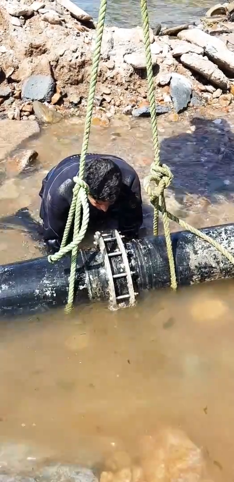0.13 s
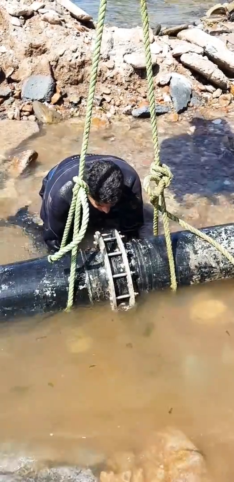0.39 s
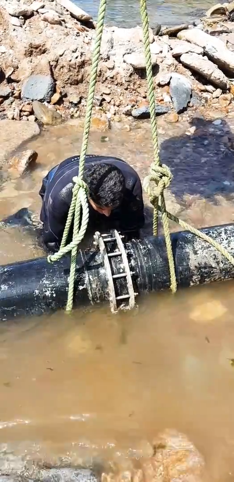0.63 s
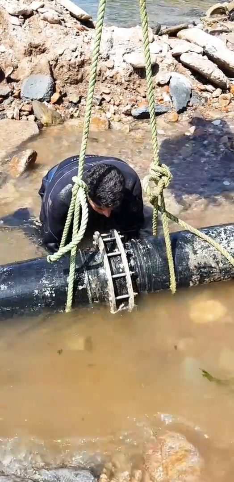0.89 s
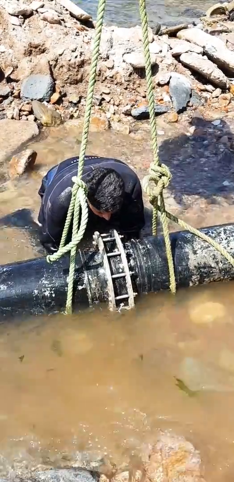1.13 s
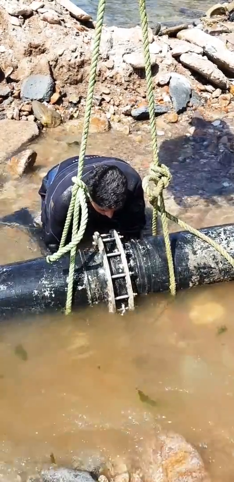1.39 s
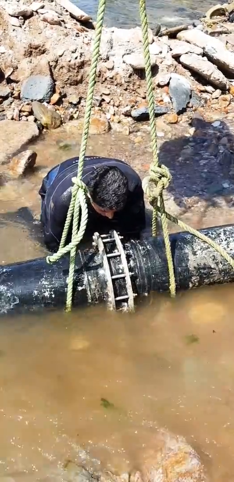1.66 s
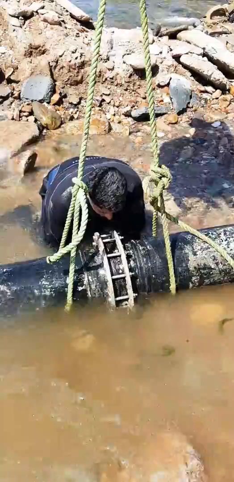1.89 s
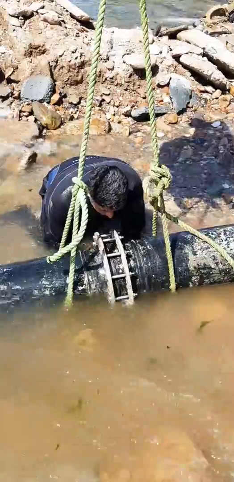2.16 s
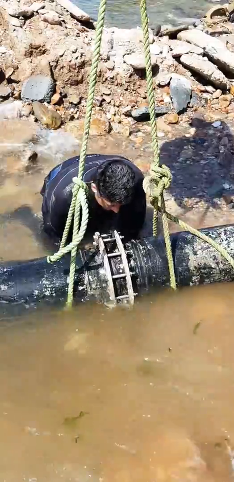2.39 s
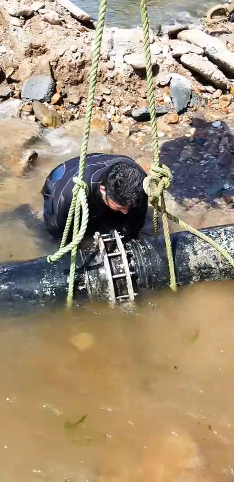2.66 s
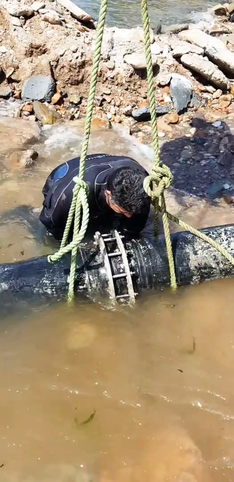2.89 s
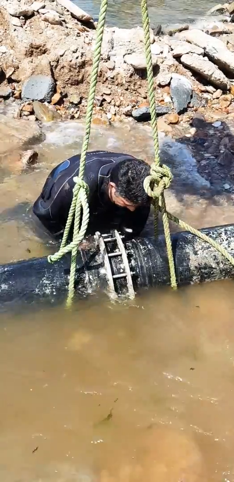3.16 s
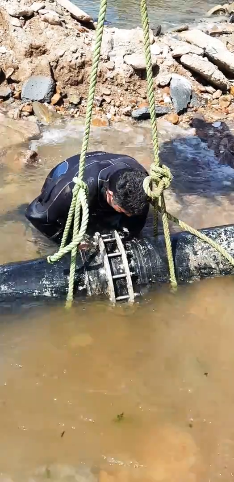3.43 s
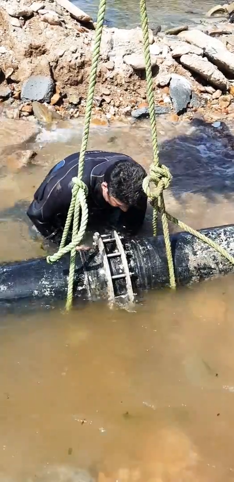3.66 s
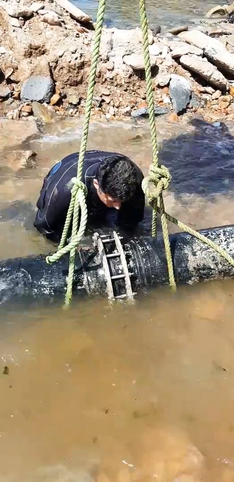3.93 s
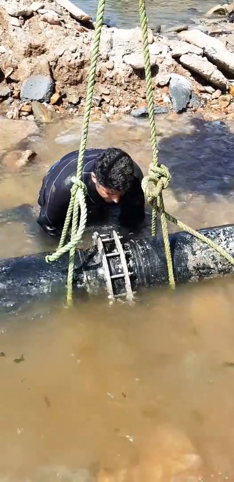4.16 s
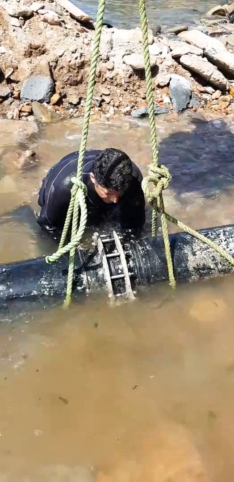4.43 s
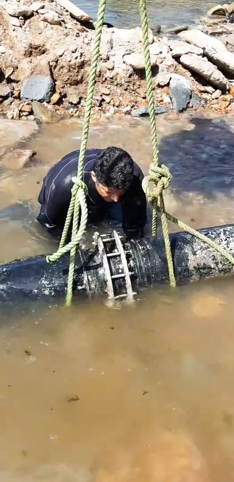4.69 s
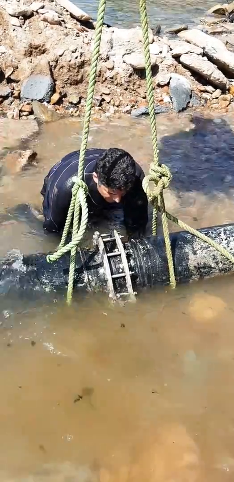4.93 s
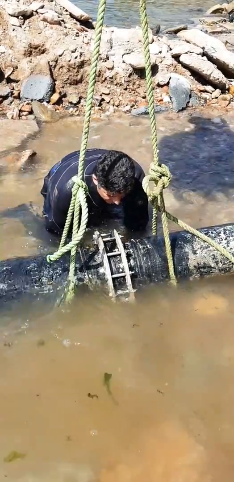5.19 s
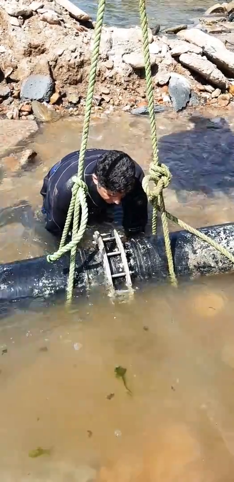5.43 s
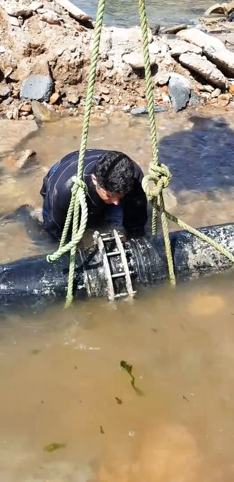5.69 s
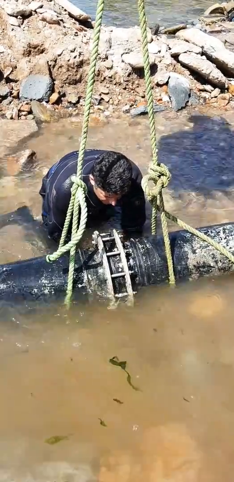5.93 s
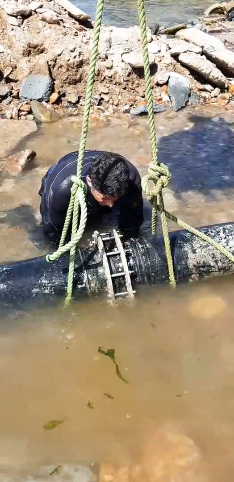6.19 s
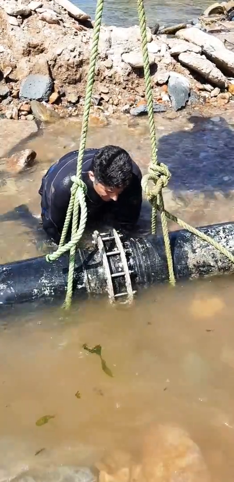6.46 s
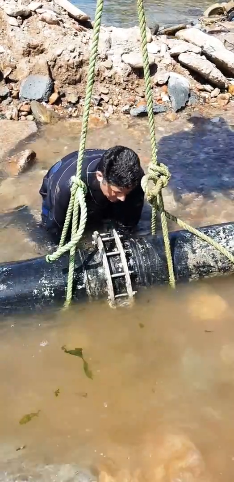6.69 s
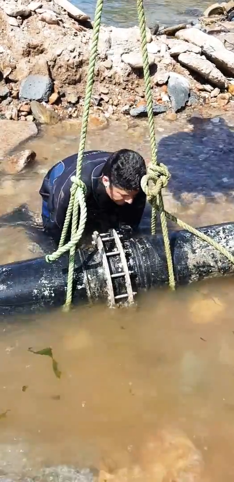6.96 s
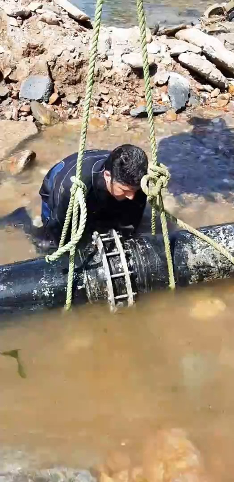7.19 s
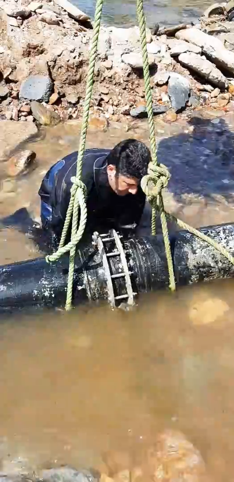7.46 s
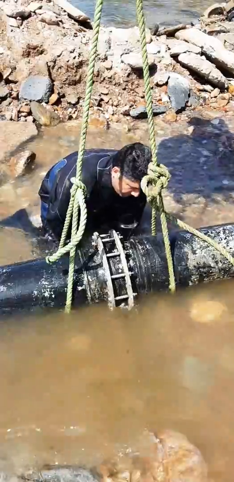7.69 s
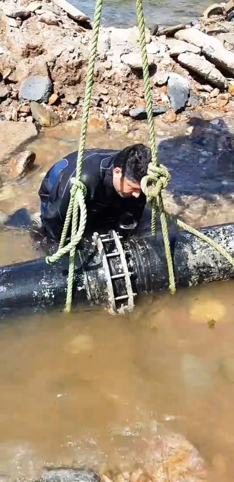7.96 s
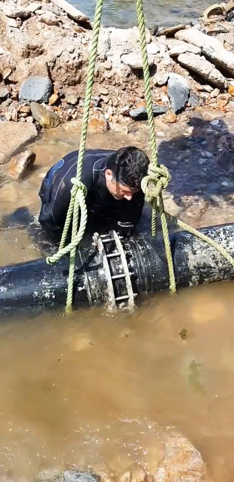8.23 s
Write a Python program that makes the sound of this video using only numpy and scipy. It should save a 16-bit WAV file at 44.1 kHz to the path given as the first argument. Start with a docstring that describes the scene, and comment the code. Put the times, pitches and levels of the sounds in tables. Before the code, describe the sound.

A diesel engine idles throughout, a deep humming drone with fast flutter and faint whine, its speed wavering about once a second and briefly sagging just before four seconds. Shallow water washes over stones in soft swells, with bubbles pattering, sharp tiny pops and a few low gulps. Open air, stereo phone close to the water, engine off to one side.

```python
"""A six-cylinder diesel idles at a rocky shore, its speed hunting a little about once a second.
Each firing rings the exhaust modes; pump and fan tones whine faintly, locked to the crank, over throbbing noise.
Wavelets wash over the stones as swelling noise bands with splashes; bubbles patter, plop and gulp as damped tones.
A phone with two microphone ports hears it in stereo."""
import sys
import numpy as np
from scipy import signal
from scipy.fft import rfft, irfft, next_fast_len
from scipy.io import wavfile
from scipy.ndimage import uniform_filter1d

SR = 44100
rng = np.random.default_rng(int(sys.argv[2]) if len(sys.argv) > 2 else 0)


def inscribe(sig):
    """Save sig as 16-bit PCM at rate SR to the path in sys.argv[1].

    A 1-D sig is mono; a 2-D sig holds one channel per row.
    Samples are clipped to [-1, 1] before scaling.
    """
    pcm = np.round(np.clip(np.atleast_2d(sig).T, -1, 1) * 32767)
    wavfile.write(sys.argv[1], SR, pcm.astype(np.int16))


def invert_db(x):
    """Field ratio 10**(x/20) for x, a level in decibels (scalar or array-like)."""
    u = np.asarray(x, float) / 20
    return 10 ** u


N = 367794
T = np.arange(N) / SR
PAD = next_fast_len(N + SR)  # a second of room for filter tails
HZ = np.arange(PAD // 2 + 1) * SR / PAD
SIDES = np.array([[1], [-1]])  # left, right
IDLE_RPM = 880


def curve(table, column=1):
    """A table column drawn as a line over time."""
    return np.interp(T, *np.transpose(table)[[0, column]])


def shape(table):
    """A (Hz, value) table drawn over all frequencies, on a log axis."""
    hz, value = np.transpose(table)
    return np.interp(np.log(HZ + 1), np.log(hz), value)


def filt(x, response):
    """Filter by a frequency response."""
    return irfft(rfft(x, PAD) * response, PAD)[..., :N]


def level(x, db):
    """Scale to an rms level."""
    return x * invert_db(db) / np.sqrt(np.mean(x ** 2))


def walk(rate):
    """Random levels held 1 / rate s and slewed twice; spread near 1."""
    hold = int(SR / rate)
    steps = np.repeat(rng.standard_normal(N // hold + 1), hold)
    return 1.54 * uniform_filter1d(uniform_filter1d(steps, hold), hold)[:N]


def noise(table):
    """Coloured two-port noise, alike in the bass and almost unrelated in the treble."""
    # Each row: frequency in Hz, likeness of the two ports from 0 to 1.
    likeness = [(60, 1), (290, 0.96), (640, 0.24), (1400, 0), (15000, 0.06)]
    alike = np.clip(shape(likeness), 0, 1)
    mid, side = rng.standard_normal((2, N))
    colour = invert_db(shape(table))
    return filt(mid, colour * np.sqrt(1 + alike)) + SIDES * filt(side, colour * np.sqrt(1 - alike))


def speed():
    """Crank rpm over time, its corners rounded by the flywheel."""
    # Hunting about the idle with one deep sag. Each row: time in seconds, crank speed in rpm before rounding.
    hunting = [(0.0, 853.4), (0.272, 894.6), (0.703, 860.2), (1.478, 912.9), (1.773, 836.3), (2.245, 916.0),
               (2.82, 851.4), (3.228, 893.3), (3.683, 882.5), (3.866, 722.1), (4.258, 952.5),
               (4.689, 816.5), (5.017, 924.4), (5.408, 871.5), (6.023, 858.8), (6.662, 906.4),
               (6.886, 853.9), (7.485, 895.3), (7.749, 851.1), (8.34, 912.1)]
    flywheel_s = 0.08
    return uniform_filter1d(curve(hunting), int(flywheel_s * SR), mode="nearest")


def load():
    """Load in dB: the governor feeds more fuel a moment after the speed sags under the idle."""
    # Fuelling: load at idle in dB, dB added per 100 rpm below idle, governor delay in seconds.
    fuelling = (2, 2.2, .12)
    idle_db, sag_db, late_s = fuelling
    sag_rpm = np.maximum(IDLE_RPM - speed(), 0)
    return idle_db + sag_db * np.interp(T - late_s, T, sag_rpm) / 100


def exhaust(cycles):
    """Every cylinder blows once a cycle and pushes or pulls each pipe mode according to its place."""
    # When each cylinder's blow leaves the pipe, in crank degrees of the 720 in a cycle.
    firing_deg = [81.7, 230.4, 333.4, 468.5, 578.5, 692.9]
    # Pipe modes. Each row: frequency in Hz, width in Hz, relative level in dB,
    # then the signed shares (no unit) of cylinders 1 to 6.
    modes = [(27.0, 6.0, 24.5, 0.19, -0.55, 0.46, -1.0, -0.14, 0.14),
             (58.5, 9.4, 26.2, 0.82, -1.0, -0.67, 0.27, -0.57, -0.77),
             (83.6, 7.2, 30.5, 0.86, 0.45, 0.89, -0.47, 1.0, 0.14),
             (110.0, 21.6, 28.5, -1.0, 0.86, 0.33, 0.29, -0.12, 0.55),
             (150.9, 14.0, 36.2, -0.66, -1.0, -0.13, 0.32, -0.32, 0.01),
             (174.9, 11.4, 32.0, 0.62, 0.77, -1.0, 0.08, 0.35, 0.28),
             (228.2, 13.0, 38.2, -0.92, 0.83, -1.0, 0.88, 0.48, 1.0),
             (244.6, 19.7, 34.3, 1.0, -0.67, 0.54, -0.67, -0.48, -0.7),
             (276.3, 21.7, 29.8, -0.26, 0.06, 0.49, 0.39, 0.42, -1.0)]
    scatter_db, jitter_cycles = 0.5, 0.0004
    muffler_hz, deep_hz, deep_db = 379.0, 75.0, -2.0
    lag_s = 0.0002  # left hears the engine later than right

    turns = np.arange(int(cycles[-1]) + 3)[:, None] + np.array(firing_deg) / 720
    chance = rng.standard_normal((*turns.shape, 2))
    # in samples; blows due after the end gather on the last sample
    at = np.interp(turns + jitter_cycles * chance[..., 0], cycles, np.arange(N))
    strength = invert_db(scatter_db * chance[..., 1])

    # each blow is an impulse shared between its two nearest samples
    blows = np.zeros((len(firing_deg), PAD))
    cylinder = np.arange(len(firing_deg))
    whole = at.astype(int)
    for step, share in ((0, 1 - at + whole), (1, at - whole)):
        np.add.at(blows, (cylinder, whole + step), share * strength)
    blows = rfft(blows)

    ring = 0
    for hz, width, db, *shares in modes:
        resonance = 1j * HZ * width / (hz ** 2 - HZ ** 2 + 1j * HZ * width)
        ring = ring + invert_db(db) * (shares @ blows) * resonance
    ring = ring / (1 + (HZ / muffler_hz) ** 10)

    # the engine stands to one side: its sound reaches one port a little later
    ring = ring * np.exp(-1j * np.pi * HZ * lag_s * SIDES)
    # only the deep part grows with load
    deep = 1 / (1 + (HZ / deep_hz) ** 4)
    deep_ring = irfft(ring * deep, PAD)[:, :N]
    upper_ring = irfft(ring * (1 - deep), PAD)[:, :N]
    return invert_db(1.36) * (deep_ring * invert_db(deep_db + load()) + upper_ring)


def whines(cycles):
    """Thin tones locked to the crank: the block shudders under load, pump and fan tones waver."""
    # Each row: pulses per engine cycle, level in dB before load and speed act, waver in dB,
    # radians by which left leads, dB gained per dB of load,
    # dB lost 4 % off the idle speed, where the casing no longer rings along.
    tones = [(8.01, -56.5, 1, .05, 5, 4), (12.01, -48.5, 0.33, .05, 0, -1), (16.07, -47, 5, .05, 2, 5),
             (48.2, -56, 0.5, .3, 2, -1), (72.2, -48, 1.2, 0.55, 0, 4), (90.05, -54.5, 2.5, .6, 0, 1),
             (97.1, -57.5, 1.8, .6, -0.5, 6), (119.6, -48.5, 1.7, 1.3, -2, .5),
             (123.5, -57.5, 2, 1.3, 0, 3)]
    off_idle = ((speed() / IDLE_RPM - 1) / 0.04) ** 2
    out = 0
    for pulses, db, waver_db, lead, gain, lost_db in tones:
        tone_db = db + waver_db * walk(4) + gain * load() - lost_db * off_idle
        phase = 2 * np.pi * pulses * cycles + 0.38 * walk(12)
        out = out + invert_db(tone_db) * np.sin(phase + SIDES * lead / 2)
    return out


def rumble(cycles):
    """Uneven combustion and body rumble: rough low noise that throbs with each crank turn and grows with load."""
    # Each row: frequency in Hz, relative density in dB per Hz.
    body = [(15, -47), (25, -17), (64, -9), (102, -9), (144, -5), (184, -6), (230, 1), (252, -3),
            (335, -22), (407, -22), (583, -34), (657, -33), (900, -38), (1170, -68), (1980, -120)]
    throb = 1 + 0.077 * np.cos(4 * np.pi * cycles - 1.5)  # two turns a cycle
    return level(noise(body), -36) * throb * invert_db(load() / 2)


def silencer_gas(cycles):
    """Gas rushing through the silencer: noise above 200 Hz that puffs once a crank turn."""
    # Each row: frequency in Hz, relative density in dB per Hz.
    rush = [(200, -46), (310, -3), (400, 4), (460, -4), (600, -19.5), (900, -40), (1500, -83)]
    puff = np.exp(0.61 * np.cos(4 * np.pi * cycles + 1.32))
    return level(filt(noise(rush), HZ > 200) * puff, -41.5)


def shore():
    """Wavelets over the stones: noisy wash, with small bubbles that follow the same swell and flicker."""
    # Each row: time in seconds, slosh level in dB, fizz level in dB (only its movement is used).
    swells = [(0.0, -46.5, -61), (0.83, -44, -55.5), (1.18, -42, -52), (1.46, -41, -50.5),
              (1.7, -42, -54.5), (2.4, -45, -54), (3.14, -43, -54.5), (3.88, -46, -59), (4.34, -46, -59.5),
              (4.6, -48.5, -60.5), (5.02, -46, -61), (6.27, -48.5, -63), (6.36, -44, -54.5),
              (6.5, -43.5, -54), (6.65, -45, -59.5), (7.5, -45, -57), (7.99, -41.5, -50.5),
              (8.34, -43.5, -54)]
    slosh_db, fizz_db = curve(swells), curve(swells, 2)
    fizz_db = fizz_db + np.mean(slosh_db - fizz_db)  # raised to the same mean as the slosh
    flicker = (0.7 * walk(40) + 1.2 * walk(150)) / 1.4
    return wash(slosh_db, fizz_db, flicker) + patter(fizz_db, flicker)


def wash(slosh_db, fizz_db, flicker):
    """Octave bands of noise that swell and flicker, slosh below and fizz above, lifted by broad splashes."""
    # Each row: frequency in Hz, relative density in dB per Hz.
    water = [(290, 9), (500, -5), (530, -4.5), (578, -10.5), (668, -5), (817, -11.5), (891, -7),
             (1220, -11.5), (1760, -13.5), (6830, -31.5), (12500, -26), (15100, -36), (15800, -33)]
    # Each row: start in seconds, lift over the wash in dB (a little less in the treble).
    splashes = [(.43, 4), (1.0, 4), (2.08, 0.5), (2.28, 3), (2.49, 3.5), (4.31, 3.5), (4.437, 7),
                (4.865, 4.5), (4.968, 9.5), (4.985, 7.5), (5.025, 4.5), (5.609, 7.5), (5.89, 7.5)]
    splash_decay_s = 0.024
    hiss = noise(water)
    hiss = hiss / np.std(filt(hiss, (HZ > 1000) & (HZ < 3000)))
    splash_db = 0
    for s, db in splashes:
        splash_db = splash_db + db * np.exp(-np.maximum(T - s, 0) / splash_decay_s) * (T >= s)
    out = 0
    for hz in 500 * 2. ** np.arange(6):
        band = np.clip(1 - abs(np.log2((HZ + 1) / hz)), 0, 1)
        bright = np.clip(np.log2(hz / 2000) / 2, 0, 1)  # 0 up to 2 kHz, 1 from 8 kHz
        band_db = slosh_db + bright * (fizz_db - slosh_db)
        band_db = band_db + (1 - 0.14 * bright) * splash_db
        band_db = band_db + (0.5 + 0.98 * bright) * flicker
        band_db = band_db + (0.5 + 0.69 * bright) * walk(45)  # each band also on its own
        out = out + filt(hiss, band) * invert_db(band_db)
    return out


def bubbles(s, db, hz, pan_db, turns, glide):
    """Damped tones, each fading by 1 / e in so many turns, whose pitch rises as the bubble nears the surface."""
    out = np.zeros((2, N + 2048))
    t = np.arange(2048) / SR
    phases = rng.uniform(-2.0, 1.75, len(s))  # half the phase by which left leads
    for start, peak_db, pitch_hz, pan, fade_turns, side in zip(s, db, hz, pan_db, turns, phases):
        length = int(min(6 * fade_turns / pitch_hz * SR, 2048))
        u = t[:length] * pitch_hz / fade_turns  # time in decay constants
        rising = u + glide * (u + np.exp(-u))
        envelope = (np.exp(-u) - np.exp(-4 * u)) * 2
        tone = envelope * np.sin(2 * np.pi * fade_turns * rising + SIDES * side)
        first = int(start * SR)
        out[:, first:first + length] += invert_db(peak_db + SIDES * pan / 2) * tone
    return out[:, :N]


def patter(fizz_db, flicker):
    """2500 small random bubbles, the higher the quieter, their level riding on the fizz."""
    s, size, pitch, pan, ring = rng.random((2500, 5)).T
    size_db = 0.5 - 7.0 * pitch - 3.2 * np.log(size + 0.024)
    hz = 750 * 17. ** pitch
    turns = 0.74 + 3.7 * ring ** 2
    drops = bubbles(s * (N / SR), size_db, hz, 8 * pan - 4, turns, glide=0.067)
    return drops * invert_db(fizz_db + 1.3 * flicker)


def plops():
    """Bursting bubbles: very short tones that all fade alike within milliseconds."""
    # Each row: start in seconds, approximate peak in dB, starting pitch in Hz, left minus right in dB.
    bursts = [(0.1168, -34, 8560, 0), (0.4349, -27, 12300, 3), (0.7773, -25, 3480, -1),
              (1.491, -24, 10900, -0.5), (1.6846, -31, 12300, -0.5), (1.9335, -27, 11900, -2),
              (1.956, -30, 4100, 3), (2.0775, -30, 4250, 0), (2.2523, -33, 9910, 4),
              (2.2787, -30, 11400, -1.5), (2.4922, -29, 14800, -5), (2.6604, -36, 4000, 0.0),
              (2.7576, -33.5, 8480, -4), (3.4775, -23, 11900, -11), (3.5473, -32, 6940, -6),
              (4.14, -32, 14700, -18), (4.3183, -28, 5170, 0), (4.4368, -30.5, 4020, -2),
              (4.8648, -34, 3800, 4), (5.615, -33, 4020, 0.0), (5.8935, -34, 11000, 3)]
    decay_s = 0.00062
    s, db, hz, pan_db = np.transpose(bursts)
    return bubbles(s, db, hz, pan_db, hz * decay_s, glide=0.018)


def gulps():
    """Deeper gulps among the stones: lower bubble tones that ring longer."""
    # Each row: start in seconds, approximate peak in dB, starting pitch in Hz, left minus right in dB.
    deep_bubbles = [(1.069, -28.5, 686, 5), (2.044, -30, 708, -4), (2.717, -29, 810, -3),
                    (4.973, -34, 1210, 6), (4.985, -32, 1756, -4), (5.023, -38, 1490, -1),
                    (5.338, -31, 900, -1), (5.629, -35, 608, 0)]
    decay_s = 0.0057
    s, db, hz, pan_db = np.transpose(deep_bubbles)
    return bubbles(s, db, hz, pan_db, hz * decay_s, glide=0.046)


def swish():
    """A thin swish near 4 kHz: narrow noise that rises in a straight line, then fades steadily in dB."""
    # Start in seconds, peak in dB, rise in seconds, fall in dB per second after the peak.
    stroke = (6.27, -50, .12, 110.)
    start, peak_db, rise, fall_db = stroke
    swell = np.clip((T - start) / rise, 0, 1) * invert_db(peak_db - fall_db * np.maximum(T - start - rise, 0))
    narrow = 1 / (1 + ((HZ - 4300) / 250.) ** 2)
    return level(filt(rng.standard_normal((2, N)), narrow), 0) * swell


def scene():
    """Engine and water together."""
    cycles = np.cumsum(speed()) / 120 / SR  # two crank turns to an engine cycle
    engine = exhaust(cycles) + whines(cycles) + rumble(cycles) + silencer_gas(cycles)
    return engine + shore() + plops() + gulps() + swish()


def roll_off(x):
    """The treble ends steeply here."""
    return signal.sosfilt(signal.butter(12, 16320, fs=SR, output="sos"), x)


def record(dry):
    """The two microphone ports differ in sensitivity over frequency, and the top is cut."""
    # Each row: frequency in Hz, left minus right in dB.
    ports = [(60, 0.5), (110, 4), (200, 2), (380, 3), (700, 2.5), (1290, 1.5), (2380, 1.5), (4400, 3),
             (8120, 5.5), (15000, -4)]
    top_hz = 15850
    response = invert_db(SIDES * shape(ports) / 2) * (HZ < top_hz)
    return roll_off(filt(dry, response))


dry = scene()
out = record(dry)
inscribe(out)
```